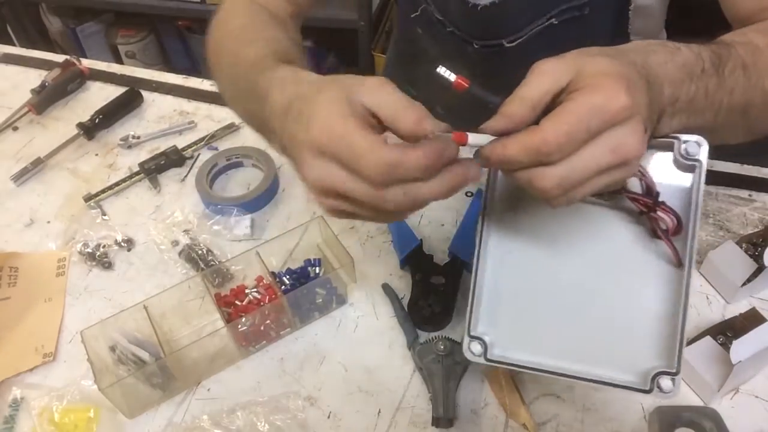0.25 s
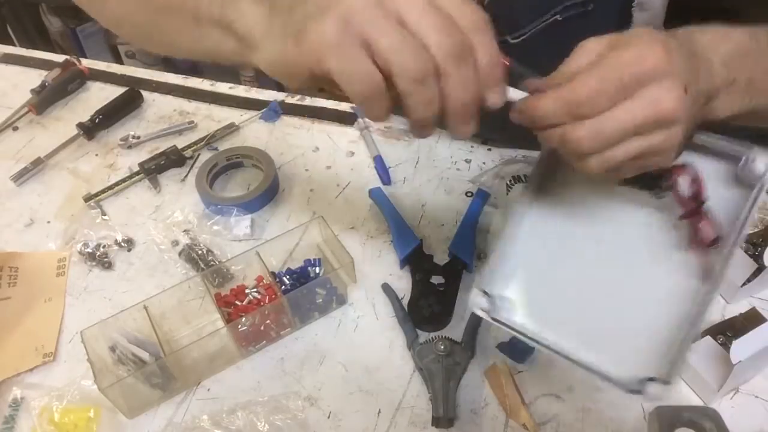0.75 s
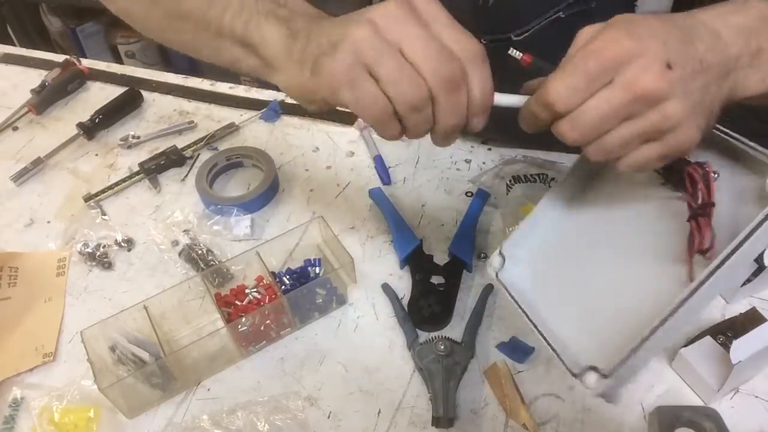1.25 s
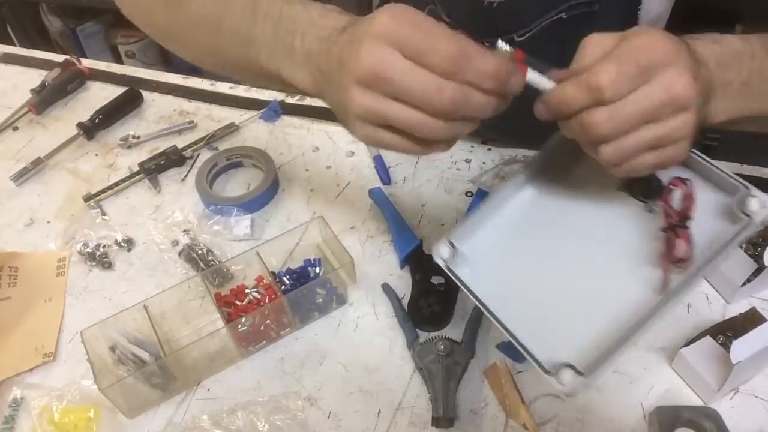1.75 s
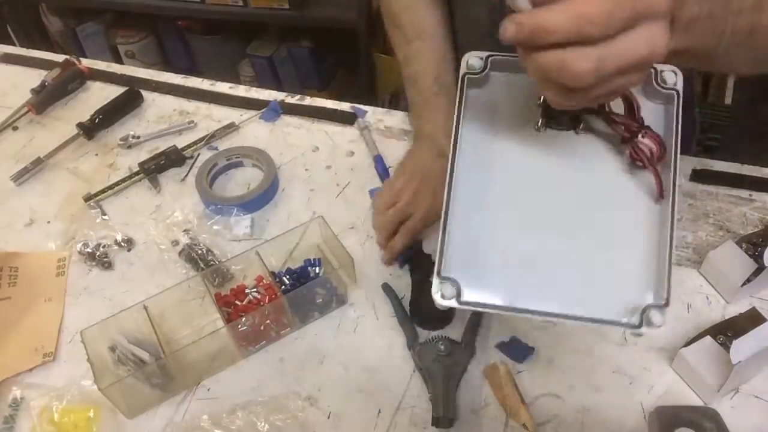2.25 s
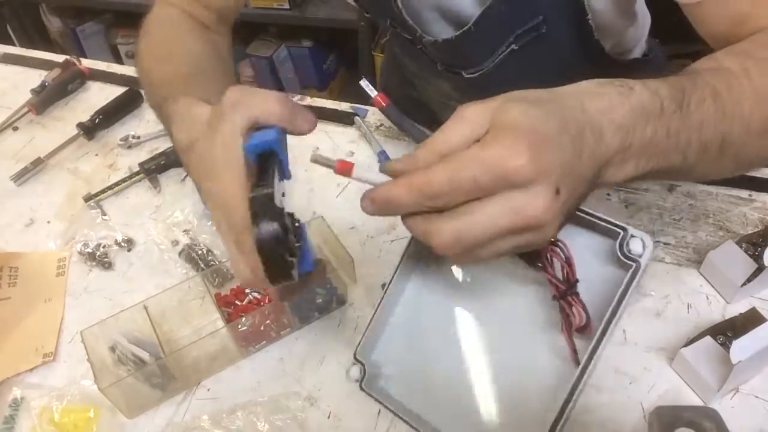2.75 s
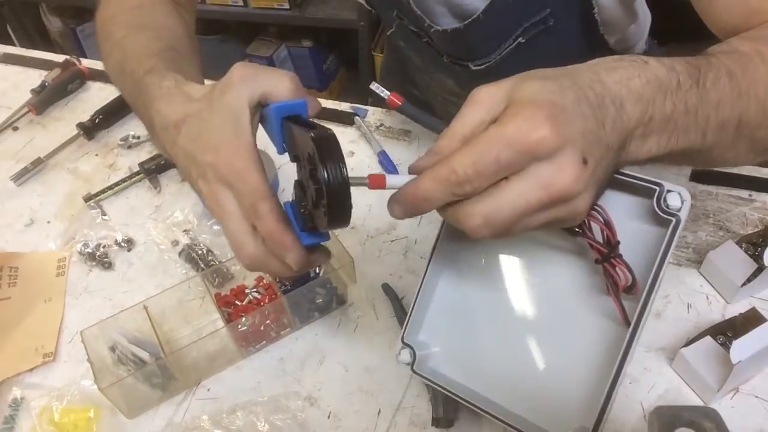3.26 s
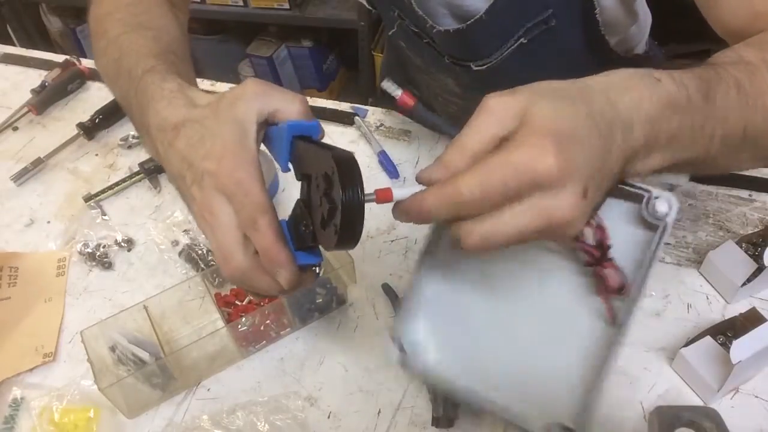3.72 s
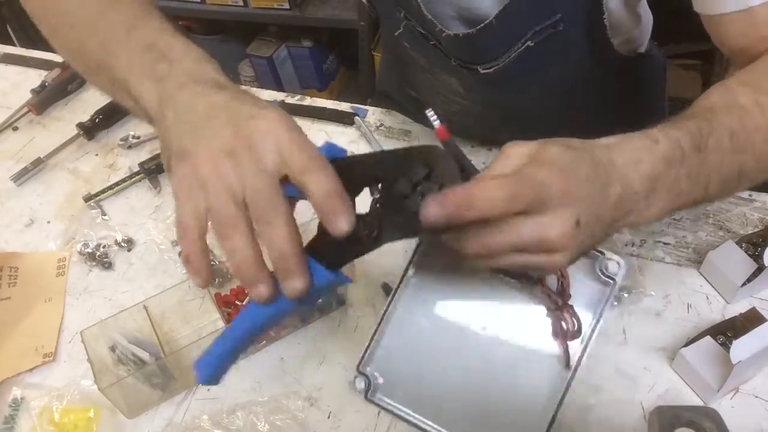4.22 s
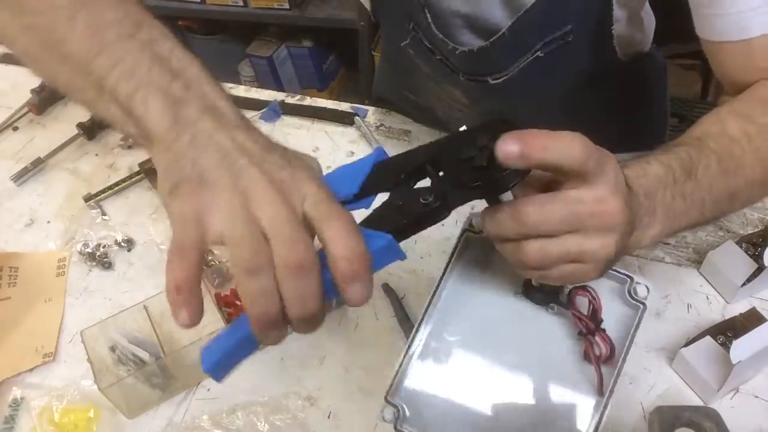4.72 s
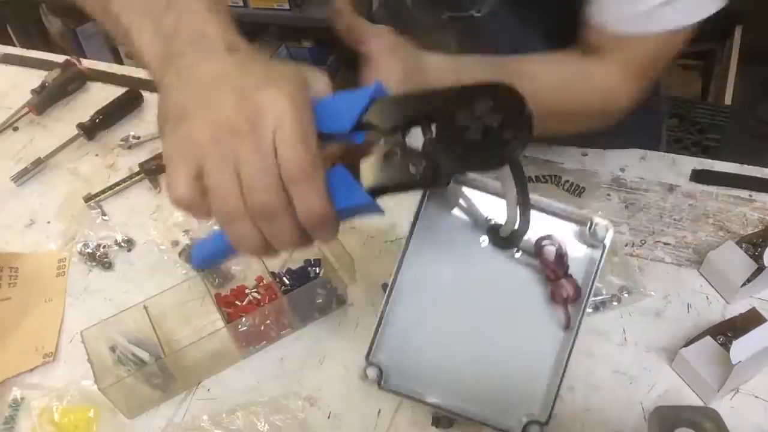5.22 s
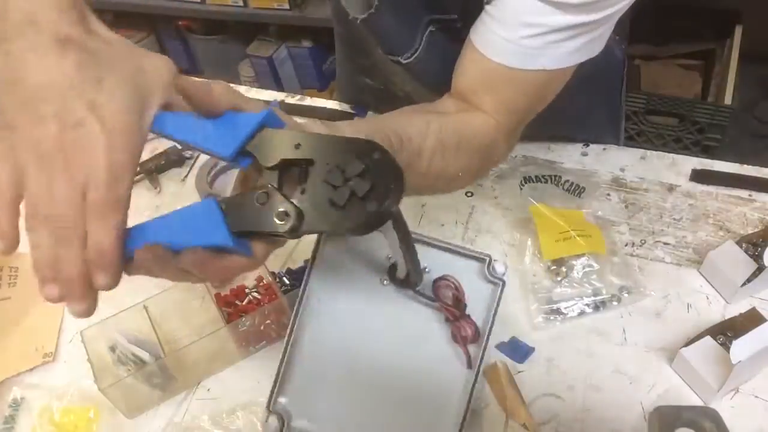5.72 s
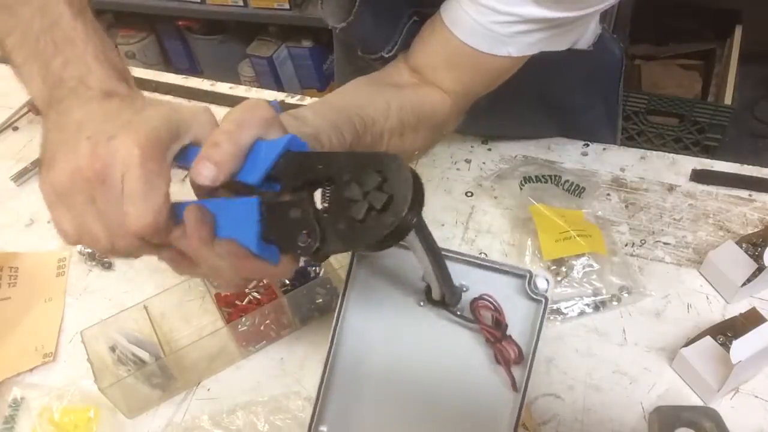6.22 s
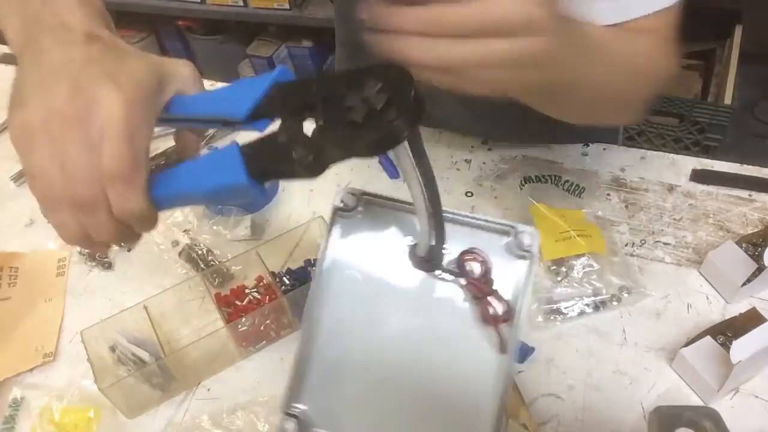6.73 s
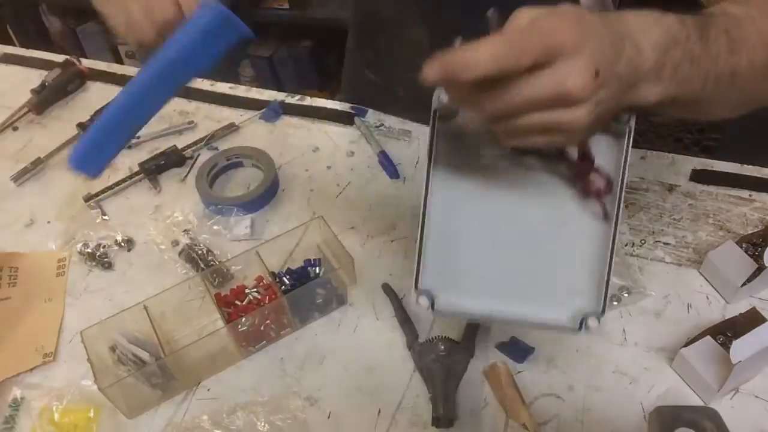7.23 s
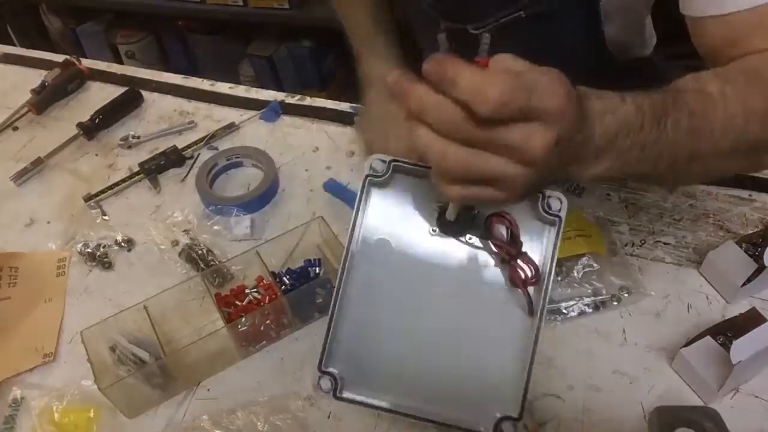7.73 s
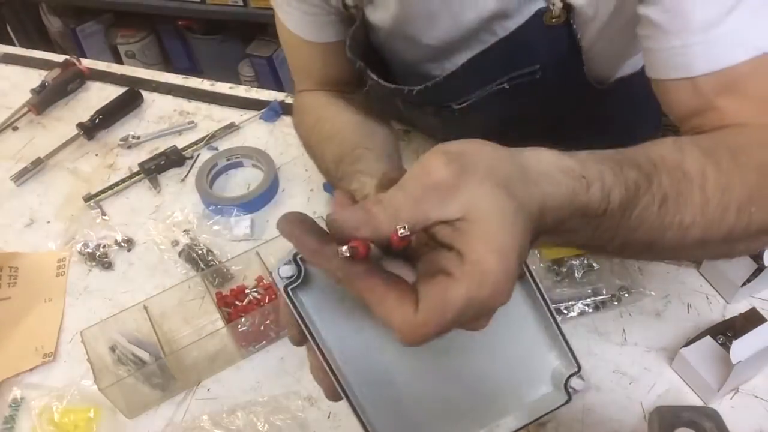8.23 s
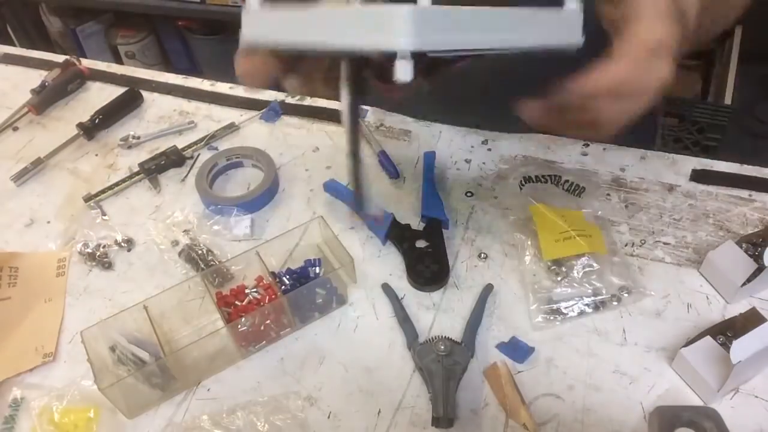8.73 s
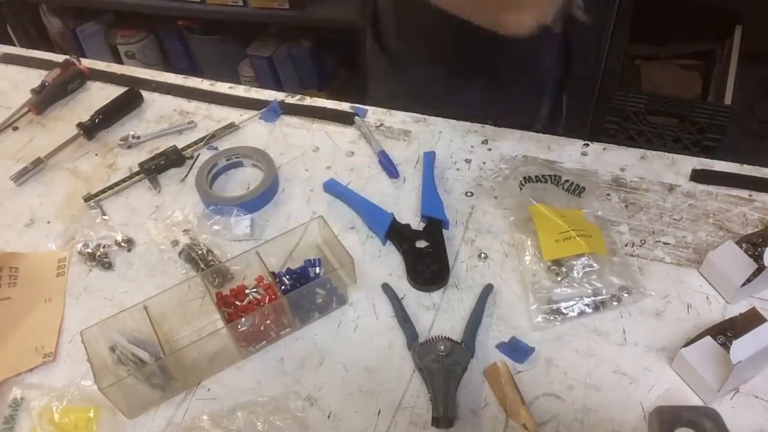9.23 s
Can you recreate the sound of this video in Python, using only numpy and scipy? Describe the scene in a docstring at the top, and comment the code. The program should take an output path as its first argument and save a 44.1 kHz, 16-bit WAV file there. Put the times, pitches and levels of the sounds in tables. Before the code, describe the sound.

A close, quiet workshop scene with short room reflections and a faint, slightly wavering fan hum throughout. The first second holds almost nothing but faint finger rubbing; small dry cable snaps come around 1.2 s. At 2.1-2.4 s a metal tool is picked up with a cluster of woody knocks, then a brief scrape at 2.5. From 3 to 4.4 s, scattered thin ticks tap a hollow plastic box, the sharpest near 3.9. A lull follows, with a few faint ticks and a soft cloth brush around 5.3. At 6.15-6.3 s three bright, hard ratchet clicks snap in quick succession, with weaker ticks until 7.05. Cloth brushes softly around 7.5; at 7.65-7.85 the heavy tool clatters onto the bench, loudest of all. Cable snaps follow near 7.95, a crackly flurry at 8.45-8.6, a sharp metallic click with scratchy plastic at 8.8, and last snaps around 8.95 and 9.2.

```python
"""Ratchet crimping at a workbench

A ferrule is pushed onto a cable and squeezed with a ratchet crimping tool: the tool is picked up,
its jaws tick on the ferrule, the pawl snaps over its teeth, and the tool clatters back onto the bench.
Cable and plastic box crackle in the hands while a fan hums in the small workshop.
Contacts are noise bursts ringing resonances and room; rubbing is swelling noise; the fan is sines and air noise."""
import sys
import numpy as np
from scipy import signal
from scipy.fft import rfft, irfft, next_fast_len
from scipy.io import wavfile
from scipy.ndimage import uniform_filter1d, map_coordinates

SR = 44100
rng = np.random.default_rng(int(sys.argv[2]) if len(sys.argv) > 2 else 0)


def transcribe(signal):
    """Save signal, clipped to [-1, 1], as a 16-bit WAV file at the path in sys.argv[1]."""
    frames = np.atleast_2d(signal).T
    limited = np.clip(frames, -1, 1)
    pcm = np.round(limited * 32767).astype(np.int16)
    wavfile.write(sys.argv[1], SR, pcm)


N = 417616

# Metal on metal, mostly the pawl and hinge: start_s, level_db, treble_db
RATCHET_CLICKS = [(2.171, -44.5, 6), (5.898, -57.5, -2), (6.1542, -35, -1), (6.2407, -26.5, 3),
                  (6.3039, -27, 1.5), (6.5648, -43.5, 10), (6.7502, -51, 3.5), (6.994, -55, -3),
                  (7.032, -44, 2), (7.0409, -36.5, 1.5), (8.789, -28, 0)]
# Broad colour of the metal clicks: pitch_hz, level_db
RATCHET_COLOUR = [(500, -28), (1000, -8.5), (1800, -19.5), (3200, -4.5), (5500, -4), (9000, -1.5),
                  (12500, -6.5), (16000, -13.5)]
# Nominal resonances of the steel tool: pitch_hz, width_hz, lift_db
STEEL_MODES = [(3550, 400, 4.5), (5270, 820, 11), (8500, 900, 10), (10900, 700, 4.8), (15100, 2300, 20)]
# Harder clicks have less bass: level_db without tilt, tilt_db per dB of level
RATCHET_HARDNESS = (-33, 0.41)


def ratchet():
    """Hard, very short metal clicks; the harder the click, the thinner its bass."""
    rows = [(start, db, [], -harder(db, RATCHET_HARDNESS), treble)
            for start, db, treble in RATCHET_CLICKS]
    return strikes(rows, RATCHET_COLOUR, STEEL_MODES, (2500, 7000, 14000), contact_s=0.0015,
                   lead_db=-39.5, room_db=-11.5, early_t60=0.047, early_db=13.0)


# Tool knocks on the bench, picked up and put down: start_s, level_db, bass_db, thud_hz, clack_hz
TOOL_KNOCKS = [(2.191, -39.5, -2, 397, 1160), (2.222, -30.5, -2, 403, 1830), (2.322, -25.5, -3, 418, 1820),
               (2.35, -32.5, -2.5, 625, 845), (7.6403, -28, -10.5, 865, 1430), (7.741, -13, -3, 533, 2370),
               (7.8135, -13.5, -2.5, 381.7, 1500), (7.832, -21, 1.5, 275, 1300)]
# Broad colour of the knocks: pitch_hz, level_db
KNOCK_COLOUR = [(60, -25.5), (130, -11.5), (250, -0.5), (450, 0), (850, -1.5), (1600, -3), (2000, -9.5),
                (3000, -9), (6000, -19.5), (16000, -36.5)]
# Nominal resonances of the bench: pitch_hz, width_hz, lift_db
BENCH_MODES = [(225, 18, 6), (531, 58, 6), (1434, 600, 3.5)]
# Harder knocks have more treble: level_db without tilt, tilt_db per dB of level
KNOCK_HARDNESS = (-21.5, 0.52)
# First hop, length of each hop over the one before, loss per hop
HOP_S, HOP_SHRINK, HOP_LOSS_DB = .0095, 0.45, 13


def bench(count=3):
    """The heavy tool strikes, chatters ever quicker and softer, and shakes the bench."""
    rows = []
    for start, db, bass, *rings in TOOL_KNOCKS:
        for k in range(count):
            hop_delay = HOP_S * (1 - HOP_SHRINK ** k) / (1 - HOP_SHRINK)
            level = db - HOP_LOSS_DB * k
            rows.append((start + hop_delay, level, rings, bass, harder(level, KNOCK_HARDNESS)))
    return strikes(rows, KNOCK_COLOUR, BENCH_MODES, (250, 1200, 6000), contact_s=0.0023,
                   lead_db=-26.0, room_db=-6, early_t60=0.14, early_db=0.5,
                   ring_db=9, ring_q=5, smooth_bins=120, size=16384)


# Ferrule and jaws tap and ring the plastic box: start_s, level_db, bass_db, ring_hz
BOX_TICKS = [(1.137, -56, -17, 2400), (1.651, -60.5, 4, 2390), (1.678, -60.5, -2, 3700),
             (2.9735, -42, 0.5, 2470), (3.0324, -42.5, -2.5, 976), (3.1315, -53, 8, 1120),
             (3.242, -47.5, 5.5, 2630), (3.26, -49, -3, 5460), (3.553, -54.5, 7, 1120),
             (3.662, -48, -3, 2250), (3.7464, -55.5, -3.5, 5030), (3.8792, -35.5, -12.5, 5930),
             (4.099, -44.5, 0, 1214), (4.1046, -39.5, -10, 7660), (4.134, -50.5, 6, 1090),
             (4.3602, -55, 0, 4000), (5.102, -55, 4, 1060), (5.2068, -42.5, -16, 3480),
             (6.358, -52.5, -18, 4020), (6.441, -54.5, -1, 3500), (6.464, -59, -8, 2480),
             (6.4974, -49, -5, 5700), (6.5395, -47, -10, 6900), (6.553, -48.5, -3, 5400),
             (6.629, -46, -6.5, 4330), (7.2218, -49.5, -10.5, 3580), (7.2305, -53.5, -10, 3300),
             (8.7, -50.5, 1, 1384), (8.72, -49.5, 2, 2550), (8.749, -45.5, 0.5, 2450),
             (8.764, -50.5, -7, 2500)]
# Soft bumps led by the lowest mode of the box: start_s, level_db
BOX_BUMPS = [(5.756, -59), (6.371, -59), (6.504, -56), (6.901, -57.5), (8.4122, -56.5)]
# Broad colour of contacts on the box: pitch_hz, level_db
TICK_COLOUR = [(300, -15.5), (700, -5.5), (1100, 2.5), (1700, -12.5), (2500, -6.5), (5500, -6.5),
               (11000, -19), (16000, -29)]
# Nominal resonances of the hollow box: pitch_hz, width_hz, lift_db
BOX_MODES = [(1138, 130, 7.7), (2325, 194, 14.5), (3620, 390, 5.5), (5720, 450, 5.6), (8230, 660, 7.2)]
REBOUND_S, REBOUND_DB = .011, -14  # longest flight of a tap's rebound, its level against the tap
BUMP_BASS_DB = 5.5  # a soft bump is mostly bass
# Each stroke of the fingers sheds tiny ticks: level over the rubbing, their bass
FIDGET_DB, FIDGET_BASS_DB = 13, 6.5


def ferrule():
    """Taps with a faint rebound, soft knocks and tiny handling ticks, carried into the hollow box."""
    box_hz = [centre for centre, width, lift in BOX_MODES]
    rows = [(start, db, [ring], bass) for start, db, bass, ring in BOX_TICKS]
    for start, db, bass, ring in BOX_TICKS:
        flight = REBOUND_S * rng.uniform(0.68, 1)
        rows.append((start + flight, db + REBOUND_DB, [rng.choice(box_hz)], bass))
    rows += [(start, db, box_hz[:1], BUMP_BASS_DB) for start, db in BOX_BUMPS]
    rows += [(start, db + FIDGET_DB, [rng.choice(box_hz[1:])], FIDGET_BASS_DB)
             for start, db in scattered(HANDLING, scatter_db=1.5, count=4)]
    return strikes(rows, TICK_COLOUR, BOX_MODES, (1500, 4500), contact_s=0.0027,
                   lead_db=-17.5, room_db=-13.5, early_t60=0.035, early_db=16.5,
                   ring_db=10.0, ring_q=10.0)


# The cable snaps free and slips on in a short run: start_s, level_db, treble_db, ring_hz
CABLE_SNAPS = [(1.187, -36, 7, 5450), (1.2194, -36, 7, 4000), (1.232, -41.5, 5, 4300),
               (2.131, -47, 5, 3670), (2.197, -44, -5, 4000), (7.932, -35, -8.5, 5740),
               (7.9564, -36.5, 0, 2520), (8.0167, -48.5, -2.5, 3650), (8.447, -51, -8, 5530),
               (8.4723, -37.5, -2, 3220), (8.4768, -30, 11, 6940), (8.4848, -32.5, -5, 5870),
               (8.506, -41.5, -3, 1230), (8.522, -40, -15, 1320), (8.541, -42, -3, 2660),
               (8.556, -40.5, -6, 6830), (8.592, -46, 6, 4630), (8.608, -48.5, 1, 6500),
               (8.7884, -28, 6.5, 2500), (8.808, -34.5, 27, 8040), (8.831, -40.5, 22, 4340),
               (8.9335, -30.5, 7, 5630), (8.963, -34.5, 4, 4940), (9.147, -55.5, 2, 4000),
               (9.197, -46.5, 7, 6000), (9.2257, -34, 8, 5630)]
# Tool and cable drag grittily over bench and box: centre_s, level_db, half_length_s
DRAGS = [(2.176, -47.5, 0.024), (8.553, -50, 0.026), (8.811, -55, 0.062)]
# Broad colour of the snaps: pitch_hz, level_db
SNAP_COLOUR = [(300, -43), (1100, -6), (1800, -11.5), (2600, -1.5), (5500, 1), (8000, -3), (11000, -9.5),
               (16000, -35)]
# Nominal resonances of the cable: pitch_hz, width_hz, lift_db
CABLE_MODES = [(1230, 140, 6.9), (2445, 120, 7.5), (7040, 210, 5.2)]
# Harder snaps have less bass: level_db without tilt, tilt_db per dB of level
SNAP_HARDNESS = (-52, 0.33)
# Base gap between slips, loss per slip, crackle against the snap
SLIP_S, SLIP_LOSS_DB, CRACKLE_DB = .0055, 10, -17.5


def cable(count=3):
    """Each scratchy snap of wire and plastic starts uneven, weaker slips amid crackle and gritty drags."""
    rows = []
    for start, db, treble, ring in CABLE_SNAPS:
        delays = SLIP_S * np.r_[0, np.cumsum(rng.uniform(.5, 2, count - 1))]
        for k, delay in enumerate(delays):
            level = db - SLIP_LOSS_DB * k
            rows.append((start + delay, level, [ring], -harder(level, SNAP_HARDNESS), treble))
    snaps = strikes(rows, SNAP_COLOUR, CABLE_MODES, (2000, 5500, 13000), contact_s=0.0027,
                    lead_db=-24.0, room_db=-9.5, early_t60=0.042, early_db=13,
                    ring_db=12.5, ring_q=10.3)
    crackle = [(start + 2 * SLIP_S, db + CRACKLE_DB, 2 * SLIP_S) for start, db, *_ in CABLE_SNAPS]
    return snaps + rub(crackle + DRAGS, SNAP_COLOUR, CABLE_MODES, grain_db=7.5)


# Fingers and cable rub on the box: centre_s, level_db, half_length_s
HANDLING = [(0.6, -80, 0.043), (1.01, -73, 0.014), (1.1, -73.5, 0.045), (1.53, -82.5, 0.029),
            (3.115, -72.5, 0.026), (3.32, -74, 0.017), (3.465, -74.5, 0.0077), (5.4, -70.5, 0.15),
            (6.72, -74.5, 0.016), (7.12, -75.5, 0.053)]
# The tool's jaws scrape as it is lifted: centre_s, level_db, half_length_s
SCRAPES = [(2.492, -38.5, 0.0023), (2.501, -49.5, 0.012)]


def fingers():
    """Soft rubbing coloured by the hollow box, its low murmur as it slides, the scrape of the lifted tool."""
    scrape_colour = [(800, -24), (1400, 2.5), (2100, 1.0), (3000, -7.0), (5000, -13.0), (16000, -24.5)]
    scrape = rub(SCRAPES, scrape_colour, [], grain_db=3.0)
    slide = rub([(1.3, -74.5, 0.4)], [(190, -20), (258, 6.5), (360, -39)], [], grain_db=4)
    return rub(HANDLING, TICK_COLOUR, BOX_MODES, grain_db=8.0) + slide + scrape


# Sleeve and apron brush as the arms move: centre_s, level_db, half_length_s
CLOTH_STROKES = [(5.32, -66.5, 0.11), (7.54, -65, 0.088)]


def cloth():
    """A soft, smoothly swelling swish of broad noise."""
    colour = [(200, -26.0), (1300, 5.5), (3800, 1.5), (8000, -11), (16000, -11)]
    return rub(CLOTH_STROKES, colour, [], grain_db=2.2)


# Fan tones, before their slow wavering: pitch_hz, rms_db
FAN_TONES = [(450, -78), (600, -65), (750, -75.5), (3900, -87)]
# Relative spectrum of the fan's air: pitch_hz, level_db (per Hz)
AIR_COLOUR = [(30, -30), (90, -11.5), (200, -0.5), (320, 0.5), (550, -4.5), (950, -3), (1600, -11),
              (6000, -19.5), (16000, -29)]


def fan(drift_hz=.5, air_db=-69.0):
    """Slightly unsteady harmonics of a fan over its rush of air; drift_hz is felt at the second tone."""
    t = np.arange(N) / SR
    # one shared time lag makes all harmonics drift together
    lag = np.cumsum(drift_hz * wobble(5.6)) / SR / FAN_TONES[1][0]
    tones = np.zeros(N)
    for hz, db in FAN_TONES:
        level = amp(db + 0.63 * wobble(3.5)) * np.sqrt(2)
        tones += level * np.sin(2 * np.pi * (hz * (t + lag) + rng.random()))
    air = unit(filtered(rng.standard_normal(N), lambda hz: amp(along(AIR_COLOUR, hz))))
    return tones + amp(air_db + 0.64 * wobble(16.0)) * air


# Decay of the workshop: pitch_hz, t60_s
WORKSHOP_DECAY = [(100, 0.44), (260, 0.31), (1840, 0.24), (4850, 0.29), (14000, 0.18)]


def room_tail(t, early_t60, early_db):
    """Quick reflections off the bench top and a slower workshop tail, at energy 1."""
    hz, s, z = signal.stft(rng.standard_normal(len(t)), SR, nperseg=256)
    decay = amp(-60 * s / along(WORKSHOP_DECAY, hz)[:, None])
    late = signal.istft(z * decay, SR, nperseg=256)[1][:len(t)]
    early = rng.standard_normal(len(t)) * amp(early_db - 60 * t / early_t60)
    tail = (late + early) * np.clip(t / 0.0019 - 1, 0, 1)  # silent before the first reflections
    return tail / np.linalg.norm(tail)


# Share of a resonance's lift that evens out in the room, which gathers sound from all sides
BLUR = .7


def strikes(rows, colour, modes, tone_hz, contact_s, lead_db, room_db, early_t60, early_db,
            ring_db=0, ring_q=1, smooth_bins=300, size=8192):
    """A brief chatter of two surfaces rings body, then room; few smooth_bins make a cleaner blow."""
    out, t, hz = np.zeros(N + size), np.arange(size) / SR, np.fft.rfftfreq(size, 1 / SR)
    lead = SR // 200  # 5 ms ahead of the blow
    u = (t - lead / SR) / contact_s
    # a graze, then the full blow
    press = np.where(u < 0, amp(lead_db) * np.exp(-np.abs(u)), np.exp(-np.abs(u) ** 1.38))
    for start, db, rings, *shelves_db in rows:
        force = even(rng.standard_normal(size) * press, smooth_bins)
        # bass and treble about a fixed middle, set by where it is hit
        tone = along(list(zip(tone_hz, np.insert(shelves_db, 1, 0))), hz)
        # the grip shifts and damps the modes a little from blow to blow
        struck = [(centre * (1 + rng.normal(0, .012)), width, lift + rng.uniform(-2.5, 2.5))
                  for centre, width, lift in modes]
        # the spot that is hit decides which resonance leads
        struck += [(ring, ring / ring_q, ring_db) for ring in rings]
        response = body(colour, struck, hz)
        direct = force * causal(amp(response + tone))
        diffuse = direct * amp(-BLUR * (response - along(colour, hz)))
        diffuse *= np.linalg.norm(direct) / np.linalg.norm(diffuse)
        reverb = amp(room_db) * diffuse * rfft(room_tail(t, early_t60, early_db))
        hit = irfft(direct + reverb)
        # level is the strength of the first 5 ms of the blow
        out[round(start * SR) - lead:][:size] += amp(db) * hit / np.std(hit[lead:2 * lead])
    return out[:N]


def rub(strokes, colour, modes, grain_db):
    """Friction that swells and fades with each stroke, sticking and slipping unevenly."""
    t = np.arange(N) / SR
    pressure = np.zeros(N)
    for centre, db, half in strokes:
        near = np.abs(t - centre) < 4 * half
        pressure[near] += amp(db) * np.exp(-.5 * ((t[near] - centre) / half) ** 2)
    slips = rng.standard_normal(N) * amp(grain_db * np.clip(wobble(300), -2, 2))
    return pressure * unit(filtered(slips, lambda hz: causal(amp(body(colour, modes, hz)))))


def harder(db, hardness):
    """How far a contact of this level tilts from bass to treble, in dB."""
    plain_db, slope = hardness
    return slope * (db - plain_db)


def scattered(strokes, scatter_db, count):
    """Small contacts (start_s, level_db) at uneven moments all through each stroke."""
    rows = []
    for centre, db, half in strokes:
        place = (np.arange(count) + rng.random(count)) / count * 2 - 1
        rows += zip(centre + 1.5 * half * place, db + scatter_db * rng.standard_normal(count))
    return rows


def body(colour, modes, hz):
    """Response in dB: a broad colour with resonances on top."""
    peaks = sum(db / (1 + (2 * (hz - centre) / width) ** 2) for centre, width, db in modes)
    return along(colour, hz) + peaks


def causal(gain):
    """The minimum-phase spectrum with this gain: it rings only after the blow."""
    cepstrum = irfft(np.log(gain + 1e-9))
    half = len(cepstrum) // 2
    return np.exp(rfft(np.r_[cepstrum[0], 2 * cepstrum[1:half], np.zeros(half)]))


def even(x, smooth_bins):
    """Spectrum of x with its broad humps levelled, so that only its fine texture stays."""
    z = rfft(x)
    power = np.abs(uniform_filter1d(np.abs(z) ** 2, smooth_bins))
    return z * causal(1 / np.sqrt(power + 1e-9))


def filtered(x, response):
    """x times a response of frequency, padded so that its tail does not wrap round."""
    m = 2 * next_fast_len((N + SR) // 2)
    return irfft(rfft(x, m) * response(np.fft.rfftfreq(m, 1 / SR)), m)[:N]


def wobble(rate):
    """A smooth random curve, rate knots a second."""
    knots = rng.standard_normal(int(N * rate / SR) + 4)
    return map_coordinates(knots, [np.arange(N) * rate / SR])


def along(points, hz):
    """Interpolate (pitch_hz, value) points on a log frequency axis."""
    f, v = np.transpose(points)
    return np.interp(np.log(hz + 1), np.log(f + 1), v)


def amp(db):
    """Decibels to gain."""
    return 10 ** (np.asarray(db) / 20)


def unit(x):
    """x at rms 1."""
    return x / np.sqrt(np.mean(x ** 2) + 1e-20)


def scene():
    """All sources at one microphone above the bench."""
    return (ratchet() + bench() + ferrule() + cable() + fingers() + cloth() + fan())[None]


def record(dry, top=1.0, top_hz=16700):
    """Soft saturation rounds off the hardest peaks, then a very steep low-pass cuts above top_hz."""
    rounded = dry[0] / (1 + (dry[0] / top) ** 4) ** (1 / 4)
    return filtered(rounded, lambda hz: 1 / np.sqrt(1 + (hz / top_hz) ** 200))[None]


dry = scene()
out = record(dry)
transcribe(out)
```